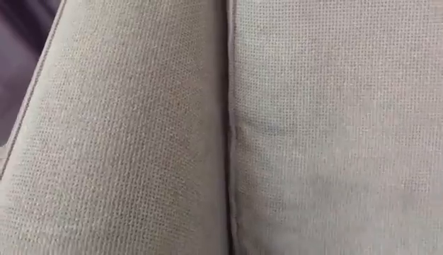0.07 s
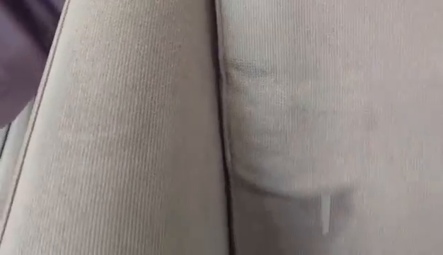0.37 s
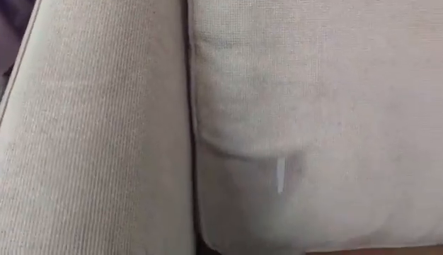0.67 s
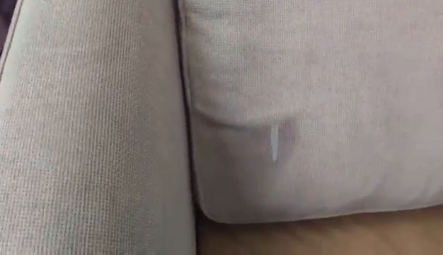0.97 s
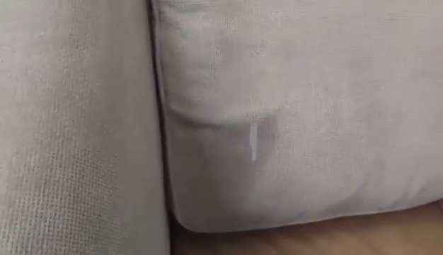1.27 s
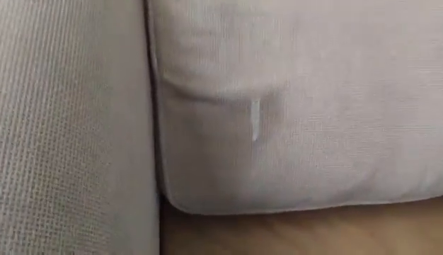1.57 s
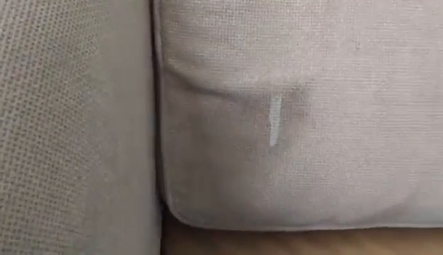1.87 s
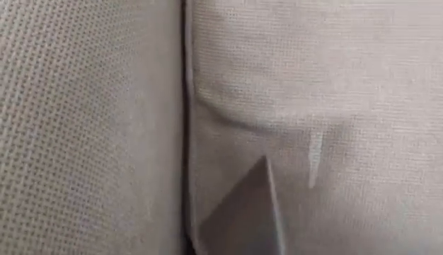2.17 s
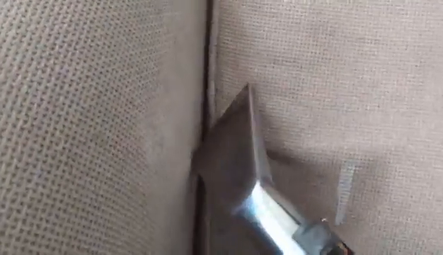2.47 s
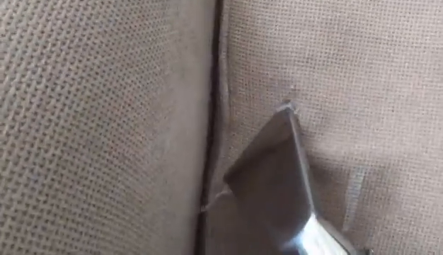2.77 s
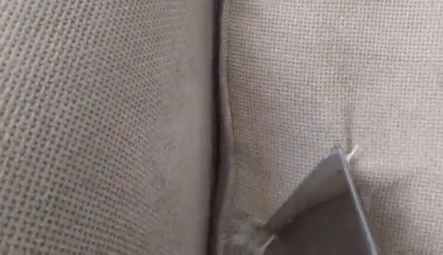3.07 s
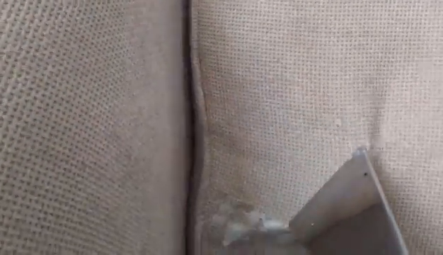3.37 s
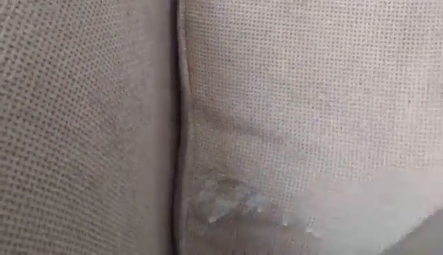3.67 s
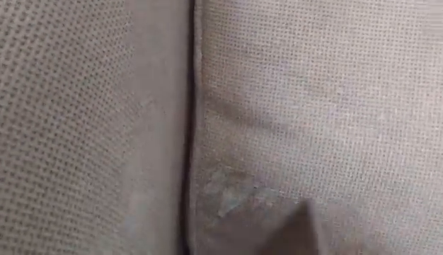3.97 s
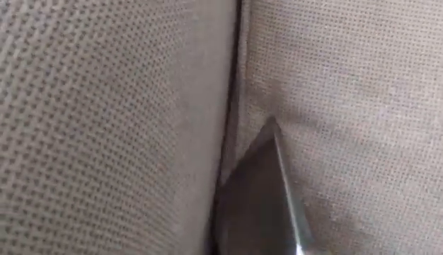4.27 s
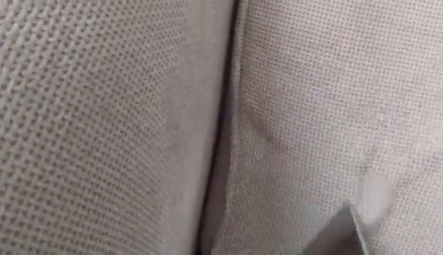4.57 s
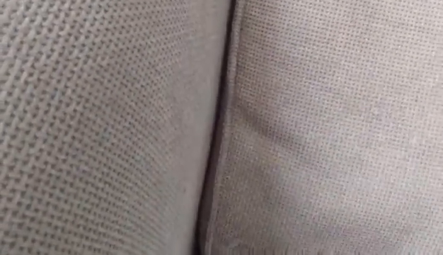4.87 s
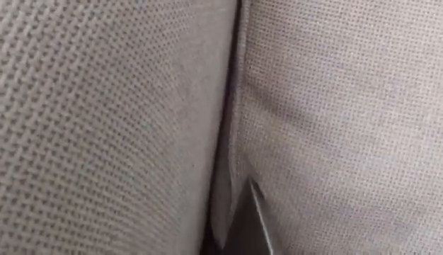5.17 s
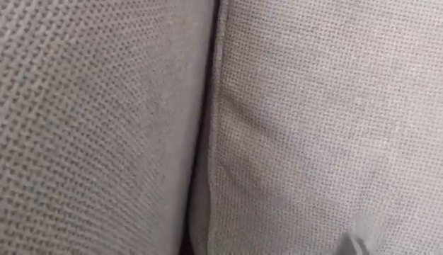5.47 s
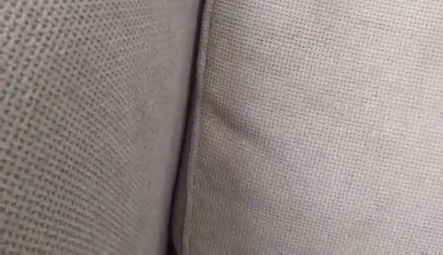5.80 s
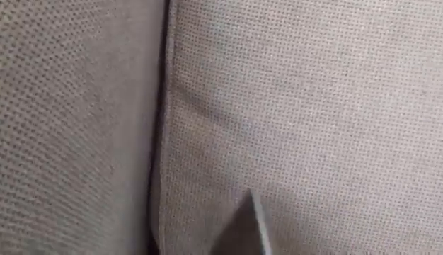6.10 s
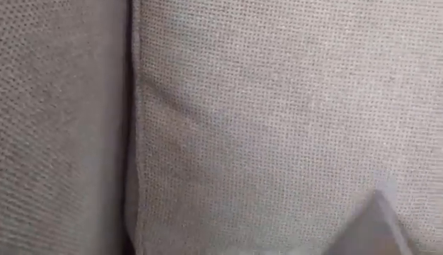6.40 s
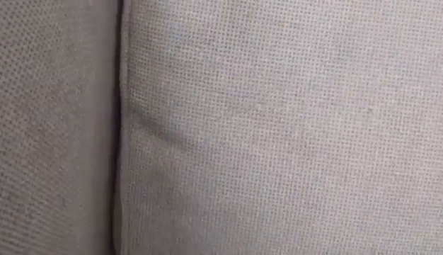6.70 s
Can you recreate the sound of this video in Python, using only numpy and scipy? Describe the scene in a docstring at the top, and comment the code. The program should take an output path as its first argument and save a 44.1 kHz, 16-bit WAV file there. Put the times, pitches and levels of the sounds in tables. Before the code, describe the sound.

An extraction cleaner's nozzle roars with rushing air, then hisses and spurts in short strokes over a wet fabric sofa.

```python
"""A small furnished room: an extraction cleaner works on a sofa, its nozzle close to the left microphone.
Held in the air, the nozzle roars with its pipe resonances and the cushion echoes it. Set down, it shuts
with a thump and hisses through wet cloth, in spurts and brief toots. As it peels off, the cloth flutters
and air rushes into the emptied hose. Farther off, the suction unit drones steadily."""
import sys
import numpy as np
from scipy import signal
from scipy.io import wavfile
from scipy.ndimage import uniform_filter1d

SR = 44100
rng = np.random.default_rng(int(sys.argv[2]) if len(sys.argv) > 2 else 0)


def to_wav(s):
    """Save 16-bit WAV."""
    ch = np.atleast_2d(s).T  # columns
    pcm = np.round(np.clip(ch, -1, 1) * 32767)  # PCM
    wavfile.write(sys.argv[1], SR, pcm.astype(np.int16))


N = 297234
FRAME, HOP = 512, 128
T = np.arange(N) / SR
HZ = np.fft.rfftfreq(FRAME, 1 / SR)
FRAME_T = np.arange(-(-N // HOP) + 1) * HOP / SR
NOW = FRAME_T[:, None]  # frame times as a column, against the bins in HZ
LOW_HZ, MIDDLE_HZ, TREBLE_HZ, TOP_HZ = (350, 1400), (2000, 7000), (2500, 12000), (9000, 15500)


def amp(db):
    """Decibels to gain."""
    return 10 ** (np.asarray(db) / 20)


def unit(x):
    """Scales to rms 1."""
    return x / np.sqrt(np.mean(x ** 2) + 1e-20)


def on_bins(table, column=1):
    """Spreads one column of a spectrum table over the frequency bins."""
    rows = np.array(table)
    return np.interp(np.log(HZ + 1), np.log(rows[:, 0]), rows[:, column])


def gate(start, end, fade_s):
    """One between two moments, with soft edges."""
    return np.sin(np.pi / 2 * np.clip(np.minimum(T - start, end - T) / fade_s + .5, 0, 1))


def frame_gate(start, end, fade_s):
    """The same gate, one value a frame."""
    return np.interp(NOW, T, gate(start, end, fade_s))


def swell_db(peak, rise, fall, shape=1.62):
    """A swell, one value a frame: 10 dB down at one rise before and one fall after its peak."""
    return -10 * np.minimum(np.maximum((peak - NOW) / rise, (NOW - peak) / fall), 20) ** shape


def band_db(gain, band):
    """Level that white noise has in a band after this gain."""
    inside = (HZ >= band[0]) & (HZ < band[1])
    return 10 * np.log10((gain ** 2 * inside).mean(-1, keepdims=True) + 1e-20)


def ramp(from_hz, to_hz):
    """Goes from 0 to 1 between two frequencies."""
    return np.clip(np.log((HZ + 1) / from_hz) / np.log(to_hz / from_hz), 0, 1)


def resonances_db(rows, at_hz):
    """Resonant peaks and dips."""
    return sum(db / (1 + (2 * (at_hz - hz) / width) ** 2) for hz, width, db in rows)


def wander(count, smoothing):
    """A random drift of rms 1, smoothed over some samples."""
    return unit(uniform_filter1d(rng.standard_normal(count), smoothing))


def eddies(frames, bins):
    """Random patches in time and frequency, of rms 1."""
    noise = rng.standard_normal((len(FRAME_T), len(HZ)))
    slow = uniform_filter1d(noise, frames, axis=0, mode="wrap")
    return unit(uniform_filter1d(slow, bins, axis=1, mode="wrap"))


def turbulence():
    """Two unrelated white noises."""
    return rng.standard_normal((2, N))


def spray(per_s, spread_db, drops_db):
    """Turbulence with the small ticks of droplets torn from the cloth."""
    sizes = amp(spread_db * np.minimum(rng.exponential(1, N), 2))
    drops = sizes * (rng.random(N) < per_s / SR)
    return unit(turbulence() + amp(drops_db) * unit(drops * np.sign(turbulence())))


def add(mix, start, sound):
    """Mixes a sound in at a moment, in seconds."""
    part = mix[max(round(start * SR), 0):][:len(sound)]
    part += sound[:len(part)]


# The microphone pair at the sofa, the left one nearer the nozzle. Each row: frequency in Hz,
# left over right in dB, likeness from 0 to 1, the left's lead in radians.
MIC_PAIR = [(60, 1.5, 0.9, 0), (161, -3, 0.98, 0), (322, 2, 0.96, 0.63), (640, 2, 0.96, 0.59),
            (1200, 6, 1, 1.1), (2060, 10, 0.25, 0.67), (3350, 15, 0.5, 1.6), (6000, 18, 0, 1.2),
            (15000, 19.5, 0.1, 0)]


def at_microphones(drive, gain):
    """Colours two unrelated drives; the right microphone lies in shadow and shares mainly the lows."""
    framing = dict(nperseg=FRAME, noverlap=FRAME - HOP)
    left, unrelated = signal.stft(drive, **framing)[2].swapaxes(1, 2)
    shadow = amp(-on_bins(MIC_PAIR))
    likeness = np.clip(on_bins(MIC_PAIR, column=2), 0, 1)
    phase = np.exp(-1j * on_bins(MIC_PAIR, column=3))
    right = shadow * (likeness * phase * left + np.sqrt(1 - likeness ** 2) * unrelated)
    centre_gain = np.sqrt(1 + 2 * likeness * shadow * phase.real + shadow ** 2) / 2
    pair = np.array([left, right]) * gain / centre_gain
    return signal.istft(pair.swapaxes(1, 2), **framing)[1][:, :N]


def room(x, t60=0.046, wet_db=-13, band_hz=(130, 3000), reflections_per_s=1500):
    """The furnished room around the sofa: a short, dull tail from sparse reflections."""
    t = np.arange(SR // 4) / SR
    taps = rng.standard_normal((2, len(t))) * (rng.random((2, len(t))) < reflections_per_s / SR)
    taps *= (t > .004) * amp(-60 * t / t60)
    taps /= np.linalg.norm(taps, axis=1, keepdims=True)
    tail = signal.sosfilt(signal.butter(2, band_hz, "bandpass", fs=SR, output="sos"), taps)
    return x + amp(wet_db) * signal.fftconvolve(x, tail, axes=1)[:, :N]


# The suction unit, well back from the microphones. Each row: frequency in Hz, relative level in dB.
DRONE_SPECTRUM = [(20, -31), (55, 11), (130, -5.5), (400, -5.5), (1000, -9), (3000, -13.5),
                  (8000, -14.5), (15500, -21)]


def suction_unit(level_db=-52):
    """The far, steady drone of the machine: noise with a heavy bass."""
    return at_microphones(turbulence(), amp(level_db) * unit(amp(on_bins(DRONE_SPECTRUM))))


# Toots at the nozzle, a little left of centre. Each row: start and end in seconds, relative level in dB,
# first and last pitch in Hz, waver as a share of the pitch.
TOOTS = [(0, 0.071, -43.5, 300, 140, 0.29), (2.676, 2.76, -54, 933, 973, .02),
         (4.423, 4.444, -46.5, 1000, 970, .02), (4.46, 4.474, -40.5, 940, 920, .02),
         (5.269, 5.285, -43.5, 960, 1000, .02), (6.337, 6.35, -46, 970, 950, .02)]


def toots():
    """The nearly shut nozzle gives brief wavering whistles and moans."""
    out = np.zeros(N)
    for start, end, db, first_hz, last_hz, waver in TOOTS:
        count = max(round((end - start) * SR), 2)
        pitch = np.geomspace(first_hz, last_hz, count) * (1 + waver * wander(count, smoothing=150))
        tone = np.sin(2 * np.pi * np.cumsum(pitch) / SR)
        add(out, start, amp(db) * unit(tone * signal.windows.tukey(count, .5)))
    return out * amp([[1], [-1.5]])


# The cloth snaps against the slot, about equally loud in both microphones; the first two rows are instead # a
# low boom as air rushes into the hose at the first lift. Each row: time in seconds, # relative level in dB,
# kick length in ms, suction dip before it as a share of the kick.
SNAPS = [(.113, -33, 3.9, .3), (0.1246, -30.5, 6.7, 0.6), (2.597, -25.5, 2.7, .4), (2.63, -28, 2.9, .5),
         (3.2195, -30.5, 1.4, 1), (3.4792, -31.5, 2.7, 0.41), (3.5706, -25.5, 1.9, 0.71),
         (4.2948, -22.5, 4, 0.39), (4.4998, -25.5, 2.5, 0.68), (4.6765, -25.5, 2.7, .5),
         (5.188, -16, 3.7, 0.59), (5.3695, -33, 3.4, .5), (5.5727, -18, 1.57, 0.78),
         (5.6299, -28, 6.7, 0.56), (5.646, -24.5, 3.5, 1), (5.699, -25, 3.2, 1), (5.7145, -21.5, 2.7, 1.1),
         (5.7865, -10.5, 1.8, 0.4), (5.8289, -15, 2.2, 0.33), (6.302, -16, 4.3, 0.052),
         (6.497, -19, 2.2, 0.89), (6.544, -19.5, 2, 0.59), (6.5535, -22, 0.85, 0.98),
         (6.5918, -18.5, 4, 0.27), (6.6397, -19, 1.9, 0.56)]
# Hose and cushion ring after a snap. Each row: frequency in Hz, relative level in dB, t60 in seconds.
HOSE_MODES = [(57.9, -8.5, 0.36), (91, -15, 0.36), (151.6, -6, 0.1), (223, -19, 0.1)]


def thumps(dip_ms=3.5, lowpass_hz=1200):
    """Suction builds, the cloth snaps shut and the stopped air kicks back; the hose rings on. The same kick
    gives the low boom of the first inrush."""
    out = np.zeros(N)
    t = np.arange(-SR // 100, SR // 3) / SR
    after = np.maximum(t, 0)
    build = np.exp(1000 * np.minimum(t, 0) / dip_ms)
    ring = sum(amp(db - 60 * after / t60) * np.sin(2 * np.pi * hz * after) for hz, db, t60 in HOSE_MODES)
    for when, db, length_ms, dip in SNAPS:
        age = 1000 * after / length_ms
        kick = np.cos(np.pi / 2 * age) * np.exp(-age / 2)
        pressure = np.where(t < 0, -dip * build, kick)
        add(out, when + t[0], amp(db) * (pressure + ring * length_ms / 5))  # long kicks ring louder
    return signal.sosfilt(signal.butter(2, lowpass_hz, fs=SR, output="sos"), out) * amp([[-.4], [.4]])


# Spells of flapping at the rim, heard close. Each row: start, wildest moment and end in seconds,
# relative level in dB. A row that ends before it starts is silent.
FLAP_SPELLS = [(2.57, 2.597, 2.35, -33), (3.55, 3.732, 3.82, -26.5), (4.66, 4.78, 4.81, -25.5),
               (5.406, 5.814, 5.89, -24), (6.434, 6.557, 6.66, -18.5)]
# The low burr of the flapping cloth. Each row: frequency in Hz, relative level in dB.
FLAP_SPECTRUM = [(20, -34), (55, -10), (85, -3), (120, -1), (150, 9), (195, -10.5), (240, -12.5),
                 (400, -18), (800, -31.5), (3000, -53), (15000, -80)]


def cloth_flutter(flaps_hz=80, unevenness=.3, air_db=-3, trim_db=-4.5, build_db=17.5, die_db=8):
    """The loose cloth slaps the rim at an uneven rate; each spell builds up and dies down."""
    rate = flaps_hz * np.exp(unevenness * wander(N, smoothing=700))
    slaps = np.diff(np.floor(np.cumsum(rate) / SR), prepend=0) * rng.uniform(0.99, 1, N)
    drive = unit(slaps - slaps.mean()) * np.array([[1], [0]]) + amp(air_db) * turbulence()
    spells = 0
    for start, wildest, end, db in FLAP_SPELLS:
        arc_db = np.interp(NOW, [start, wildest, end], [-build_db, 0, -die_db])
        spells = spells + amp(db + arc_db) * frame_gate(start, end, fade_s=0.0081)
    colour = unit(amp(on_bins(FLAP_SPECTRUM)))
    return at_microphones(drive / drive[0].std(), colour * amp(trim_db) * spells)


# Water and air spurt through the slot, close on the left. Each row: start and end in seconds,
# relative level in dB, centre in Hz, width in octaves.
SPURTS = [(2.607, 2.636, -34.5, 4470, 0.7), (2.766, 2.835, -41, 5160, 0.41),
          (2.972, 2.99, -43, 14000, 0.22), (3.016, 3.022, -44, 700, 1), (3.108, 3.132, -41, 10900, 0.67),
          (3.164, 3.218, -33, 4360, 0.71), (3.274, 3.286, -27, 13000, 0.94),
          (3.546, 3.585, -34.5, 3050, 0.92), (3.583, 3.634, -38, 2730, 0.44),
          (3.641, 3.651, -36, 900, 0.61), (4.28, 4.326, -38.5, 6150, 0.42), (4.667, 4.69, -47, 4800, .7),
          (5.175, 5.214, -37.5, 7100, .3), (5.271, 5.349, -37, 5770, 0.94),
          (5.577, 5.718, -36.5, 5460, 0.23), (6.576, 6.592, -30.5, 4250, 1), (6.612, 6.64, -30, 3030, 0.89)]


def spurts(edge_s=0.0012, growth_db=5, trim_db=-2.5):
    """Short bursts of spray, each with the pitch of its own gap; they grow until the cloth shuts them."""
    gain = 0
    for start, end, db, hz, octaves in SPURTS:
        colour = unit(np.exp(-.5 * (np.log2((HZ + 1) / hz) / octaves) ** 2))
        swell = amp(db + growth_db * np.interp(NOW, [start, end], [-.5, .5]))
        gain = gain + swell * frame_gate(start, end, edge_s) * colour
    drive = spray(per_s=2500, spread_db=3, drops_db=-4)
    return at_microphones(drive, gain * amp(trim_db + 2 * eddies(frames=8, bins=6)))


# The slot rests sealed on the sofa. Each row: start and end in seconds, relative hiss level in dB,
# then fizz and rim leak in dB against the hiss.
SEALED_STROKES = [(0, .1, -62, -4, -14), (2.614, 3.8, -46.5, -1, -8), (4.285, 4.83, -46, -1.5, -3),
                  (5.193, 5.85, -48.5, 1.5, -5), (6.349, 6.68, -47.5, -2, -3)]
# The nozzle is dragged over the cushion and the hiss swells. Each row: peak time, rise and fall in
# seconds, relative hiss level in dB, then fizz and rim leak in dB against the hiss.
DRAGS = [(2.69, 0.13, .08, -42.5, -9, 2.5), (2.825, 0.12, 0.022, -40.5, -1, 0.5),
         (2.95, 0.096, .025, -52, 6, -14), (3.21, 0.033, 0.017, -35.5, -18, -6),
         (3.275, 0.041, .02, -40.5, -5, -3.5), (3.365, 0.022, .05, -45, -5, -3),
         (3.475, .075, 0.036, -39, -6, -5.5), (3.61, .06, 0.058, -38.5, -4, -1),
         (4.31, 0.017, 0.042, -40.5, -4, 1.5), (4.44, 0.031, 0.065, -42, -5, -5.5),
         (4.686, 0.027, 0.012, -30, -13, -4.5), (5.305, 0.024, .085, -38, -6, -3),
         (5.563, 0.071, 0.049, -27.5, -10, -4), (5.62, 0.088, 0.047, -28.5, -7, -2.5),
         (5.7, 0.051, 0.062, -29, -7, -7.5), (5.785, .045, .11, -26.5, -10.5, -3.5),
         (6.47, 0.017, 0.013, -42, -12, -6)]
# Water left in the slot fizzes on after a lift. Each row: as for the drags.
DRAINING = [(4.12, .2, .3, -55, 3, -15), (4.95, .1, .3, -56, 3, -15)]


def suction_levels(fade_s=.008):
    """Hiss, fizz and rim leak in dB: the sealed slot, plus swells as it drags, drains, peels and snaps."""
    parts = []
    for start, end, db, fizz, leak in SEALED_STROKES:
        parts.append((db + 20 * np.log10(frame_gate(start, end, fade_s) + 1e-6), fizz, leak))
    for peak, rise, fall, db, fizz, leak in DRAGS + DRAINING:
        parts.append((db + swell_db(peak, rise, fall), fizz, leak))
    for peak, _, rise, peeling, _, inrush_db, *_ in LIFTS:  # the cloth peels off just before each inrush
        parts.append((inrush_db - 3.5 + swell_db(peak - 0.84 * rise, peeling, fall=0.05), -7, -4))
    for when, snap_db, *_ in SNAPS:  # a puff of air with each snap
        parts.append((snap_db - 20.5 + swell_db(when, rise=0.02, fall=0.0049), -10, 3))
    power = sum(amp([db, db + fizz, db + leak]) ** 2 for db, fizz, leak in parts)
    return 10 * np.log10(power + 1e-12)


# The hiss through the cloth, close to the left microphone. Each row: frequency in Hz, relative level in dB.
HISS_SPECTRUM = [(20, -14), (55, -4), (130, 1), (300, -2.5), (480, 1.5), (700, -3), (1000, 1), (1350, 1.5),
                 (1720, -6), (2050, 4.5), (2500, 6), (3300, 4), (4800, 5.5), (7000, -5), (11000, -15),
                 (15500, -21)]


def cloth_hiss(trim_db=-1.9, rim_db=-2.5):
    """Air drawn through wet weave: fizzy when the slot seals, fuller when its rim leaks."""
    hiss_db, fizz_db, leak_db = suction_levels()
    gain = amp(on_bins(HISS_SPECTRUM))
    gain = gain * amp(hiss_db - band_db(gain, MIDDLE_HZ))
    gain *= amp((fizz_db - band_db(gain, TOP_HZ)) * ramp(4900, 10750))
    gain *= amp((leak_db + rim_db - band_db(gain, LOW_HZ)) * ramp(1740, 820))
    gain *= amp(trim_db + 1.96 * eddies(frames=16, bins=6) + 1.5 * eddies(frames=4, bins=160))
    return at_microphones(spray(per_s=2500, spread_db=-1, drops_db=-3.5), gain)


# The lifted pipe sings on one resonance, close on the left. Each row: peak time in seconds,
# rise and fall time in seconds (one value), level in dB.
WHISTLES = [(.27, .07, -48), (.48, 0.078, -43), (1.02, .15, -49.5), (1.57, 0.13, -42.5), (2.14, .05, -46),
            (2.32, .055, -43.5), (4.23, .05, -45), (6.03, .07, -48.5)]


def pipe_whistle(hz=2780, width_hz=55):
    """A fuzzy whistle that swells and fades in the open pipe."""
    line = unit(np.exp(-.5 * ((HZ - hz) / width_hz) ** 2))
    swells = sum(amp(db + swell_db(peak, slope, slope)) for peak, slope, db in WHISTLES)
    return at_microphones(turbulence(), line * swells)


# The nozzle's height over the cushion in the long first lift. Each row: time in seconds, echo lag in ms.
HIGH_LIFT = [(.1, .1), (.45, 1.06), (.87, 1.76), (1.25, 1.88), (1.5, 2.12), (1.63, 2.06), (1.85, 1.33),
             (2.25, .38), (2.6, .05)]


def echo_lag_ms(rest_ms=.06, arch_tops_ms=(.24, .19, .14)):
    """The echo's lag follows the height of the hand: one high lift, then three low arches."""
    lag = np.interp(NOW, *np.transpose(HIGH_LIFT), right=rest_ms)
    for (peak, down, *_), top in zip(LIFTS[1:], arch_tops_ms):
        along = np.clip((NOW - peak) / (down - peak), 0, 1)
        lag += top * (1 - (2 * along - 1) ** 2)
    return lag


def cushion_comb(lag_ms, held_high, inrush, second_share=0.34, second_lag_ms=0.62):
    """Echoes off the cushion comb the roar: the nearer the nozzle, the wider and deeper the comb."""
    phase_per_ms = -2j * np.pi * HZ / 1000
    echo = .55 / (1 + lag_ms / 2) * ramp(500, 1600)
    echo *= 1 - (.6 - .45 * held_high) * ramp(5500, 12000)  # close cloth swallows the top of the echo
    echo *= 1 - .6 * inrush  # an inrush drowns it
    second_echo = second_share * held_high * np.exp(phase_per_ms * second_lag_ms)
    return abs(1 + echo * np.exp(phase_per_ms * lag_ms) * (1 + second_echo))


# The nozzle leaves the sofa, close to the left microphone. Each row: inrush peak, set-down, rise,
# peeling and closing times in seconds, then in dB the inrush level, the steady roar level, the settled
# treble against the roar and the gain on nearing the cloth.
LIFTS = [(0.128, 2.618, .018, 0.013, .012, -29, -39.5, -6, 1.5),
         (3.82, 4.287, 0.032, 0.034, .012, -26.5, -37, -7, 3.5),
         (4.86, 5.186, 0.051, 0.058, .012, -27, -35.5, -7, -0.5),
         (5.865, 6.3, 0.046, .08, 0.0018, -34, -41, -6.5, 4.5),
         (6.695, 6.73, 0.044, .055, 0.015, -28.5, -37, -3.5, -0.5)]


def airflow(inrush_s=0.058, bright_s=0.26, bright_db=5.5, nearing_s=0.25, nearing_dull=.4):
    """Roar and treble in dB: a bright inrush settles to a steady flow, shifts near the cloth and shuts."""
    roar_db, treble_db = np.full_like(NOW, -100), np.zeros_like(NOW)
    for peak, down, rise, _, closing, inrush_db, steady_db, settled_db, nearing_db in LIFTS:
        age = np.maximum(NOW - peak, 0)
        approach_db = nearing_db * np.exp(-((NOW - down) / nearing_s) ** 2)
        level = steady_db + (inrush_db - steady_db) * np.exp(-age / inrush_s) + approach_db
        level += swell_db(peak, rise, np.inf) - 10 * np.clip((NOW - down) / closing, 0, 10)
        brightness = settled_db + bright_db * np.exp(-age / bright_s) - nearing_dull * approach_db
        begun = NOW > peak - 2 * rise
        roar_db = np.where(begun, level, roar_db)
        treble_db = np.where(begun, brightness, treble_db)
    facing = np.exp(-((NOW - 1.615) / 0.26) ** 2)  # the nozzle turns towards the microphone once
    return roar_db + 2.7 * facing, treble_db + 0.61 * facing


def airborne(fade_s=0.007):
    """A gate that is open from the rise of each lift until the nozzle has closed on the cloth."""
    gates = [gate(peak - 2 * rise, down + 2 * closing, fade_s)
             for peak, down, rise, _, closing, *_ in LIFTS]
    return np.sqrt(sum(lift ** 2 for lift in gates))


# The open nozzle at close range: the colours of steady roar and sudden inrush, weighted by the flow.
# Each row: frequency in Hz, relative level in dB at full weight.
ROAR_SPECTRUM = [(20, -46), (60, -17), (150, -6), (255, 1), (305, -9), (420, 7), (720, 3.5), (1300, -1.5),
                 (1680, -15.5), (2100, -8), (3200, -17.5), (5300, -19.5), (8000, -16), (11500, -28),
                 (15500, -45)]
INRUSH_SPECTRUM = [(20, -25), (60, -18), (200, -7), (600, 2), (1300, 2.5), (1650, -9.5), (2100, 1.5),
                   (2700, 3), (3300, -6.5), (4700, -4.5), (7000, -10), (11000, -14.5), (15500, -39)]
# The pipe's resonances, and the hollow colour it gains high above the cushion.
# Each row: centre in Hz, width in Hz, peak or dip in dB at full strength.
PIPE_RESONANCES = [(153, 46, 5), (520, 510, 3.5), (620, 70, -3.5), (906, 47, -4), (1020, 120, 3),
                   (2450, 270, 4), (2760, 230, 10.5), (3776, 390, 13.5), (4770, 194, 12), (5870, 400, 7)]
HOLLOW_COLOUR = [(280, 70, 3.5), (367, 87, -17), (1270, 300, 2.5), (1830, 380, 2), (3900, 250, 2),
                 (12500, 11000, -5.5)]


def open_nozzle(steady_treble_db=-5, inrush_treble_db=1, waver=0.0046, ripple_db=0.7):
    """Air roars into the pipe; a hard inrush is brighter and blurs the resonances."""
    roar_db, treble_db = airflow()
    lag_ms = echo_lag_ms()
    inrush = np.clip((treble_db - steady_treble_db) / (inrush_treble_db - steady_treble_db), 0, 1)
    held_high = np.clip(lag_ms - .5, 0, 1)
    wavering_hz = HZ * (1 + waver * eddies(frames=20, bins=24))  # the resonances waver with the flow
    pipe_db = resonances_db(PIPE_RESONANCES, wavering_hz) + held_high * resonances_db(HOLLOW_COLOUR, HZ)
    flow_db = (0.5 - inrush) * on_bins(ROAR_SPECTRUM) + inrush * on_bins(INRUSH_SPECTRUM)
    gain = amp(flow_db + (1 - 0.55 * inrush) * pipe_db) * cushion_comb(lag_ms, held_high, inrush)
    gain *= amp(roar_db - band_db(gain, LOW_HZ))
    gain *= amp((roar_db + treble_db - band_db(gain, TREBLE_HZ)) * ramp(1500, 2600))
    gain *= amp(0.85 * eddies(frames=26, bins=5) + .6 * eddies(frames=4, bins=90))
    gain *= amp(ripple_db * ramp(3100, 7000) * eddies(frames=70, bins=3))  # ridges drift in the treble
    return at_microphones(turbulence(), gain) * airborne()


def scene():
    """Nozzle and cloth up close, the machine farther off, all in the one room."""
    in_the_air = open_nozzle() + pipe_whistle()
    on_the_cloth = cloth_hiss() + spurts() + cloth_flutter() + thumps() + toots()
    return room(in_the_air + on_the_cloth + suction_unit())


def record(dry, lowest_hz=32, highest_hz=15750):
    """The microphones lose the deepest bass; a steep band limit takes off the very top."""
    thinned = signal.sosfilt(signal.butter(2, lowest_hz, "highpass", fs=SR, output="sos"), dry)
    band_limit = signal.firwin(511, highest_hz, window=("kaiser", 9), fs=SR)
    return signal.oaconvolve(thinned, band_limit[None], "same", axes=1)


dry = scene()
out = record(dry)
to_wav(out)
```